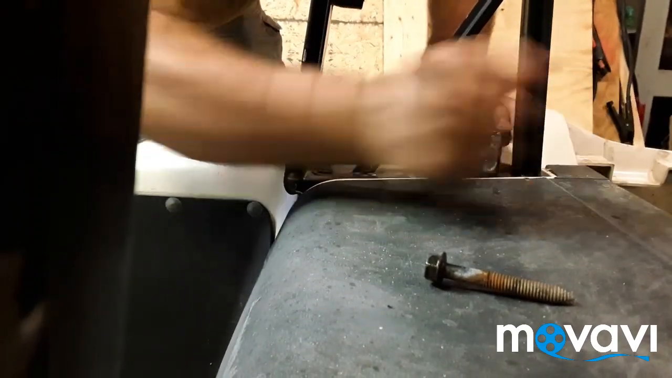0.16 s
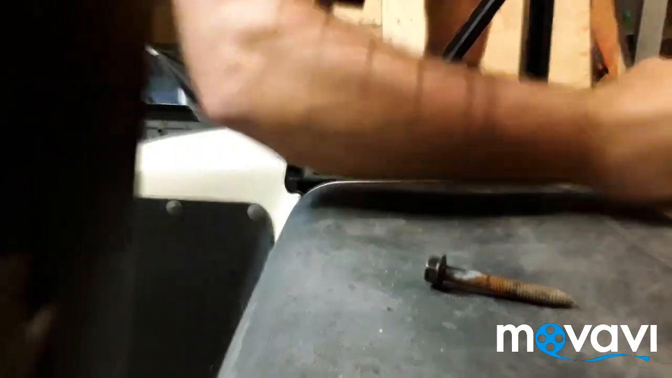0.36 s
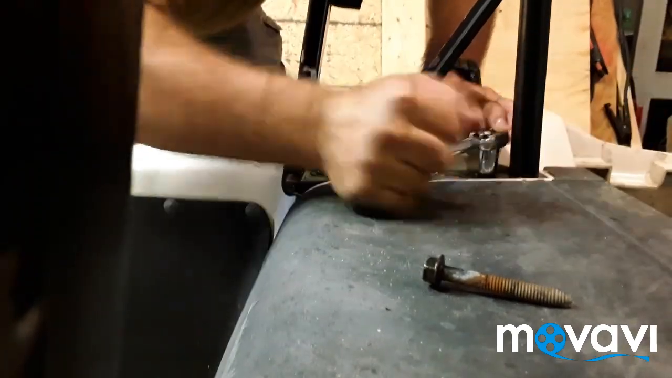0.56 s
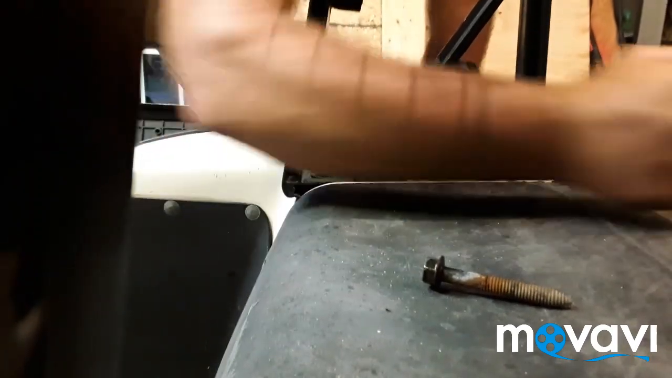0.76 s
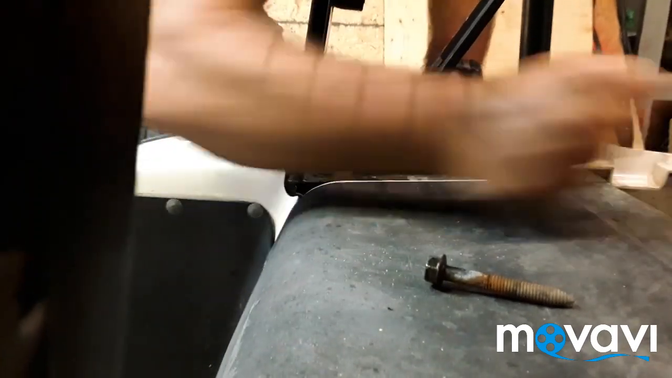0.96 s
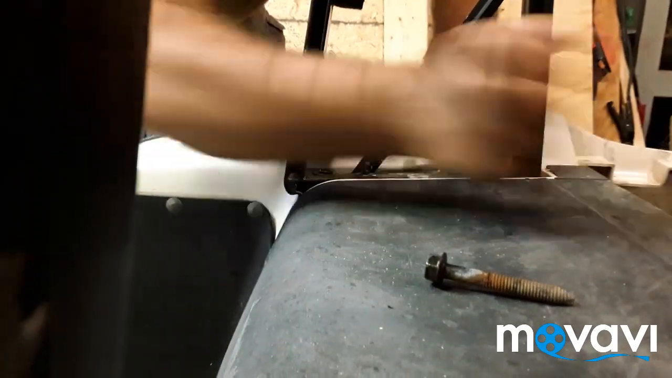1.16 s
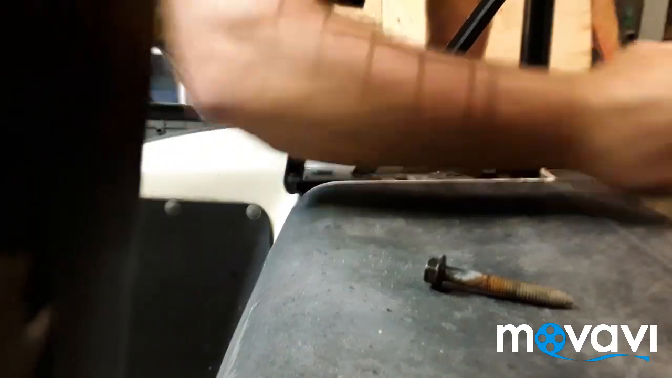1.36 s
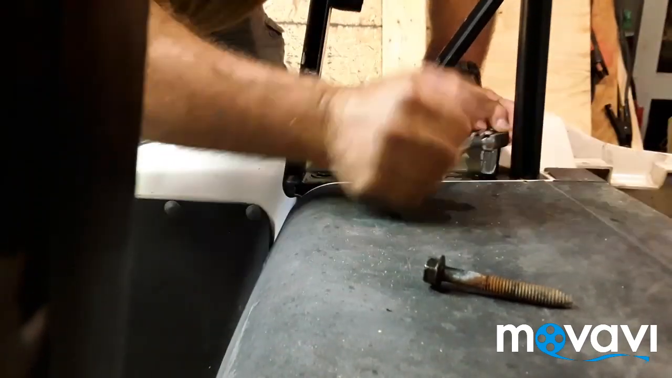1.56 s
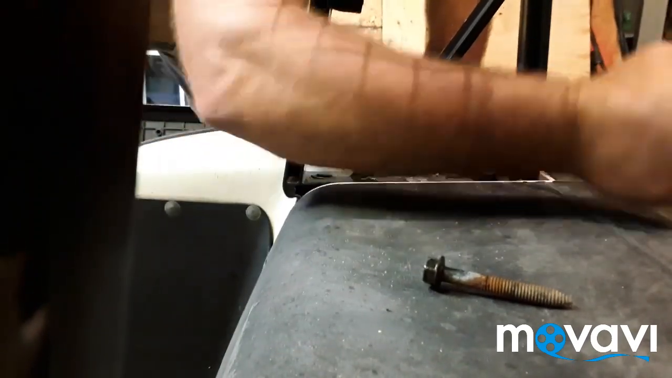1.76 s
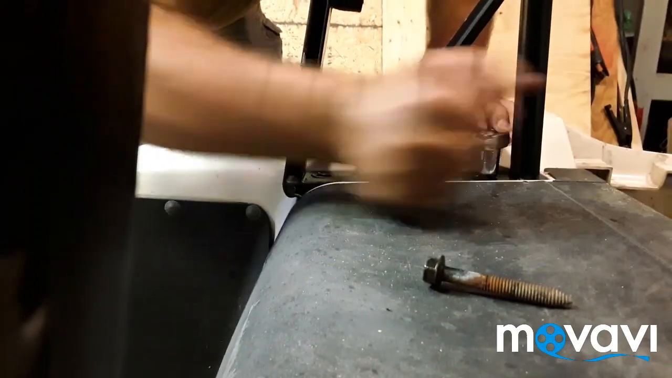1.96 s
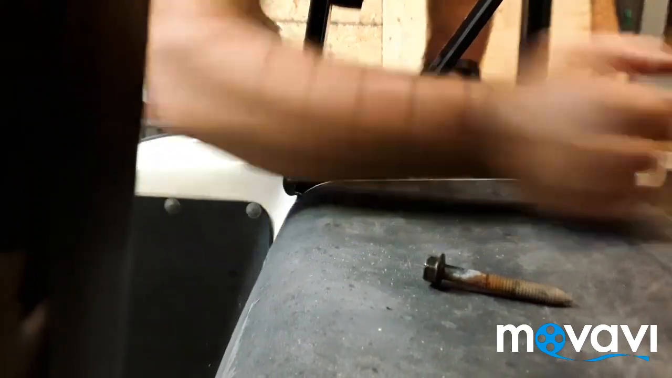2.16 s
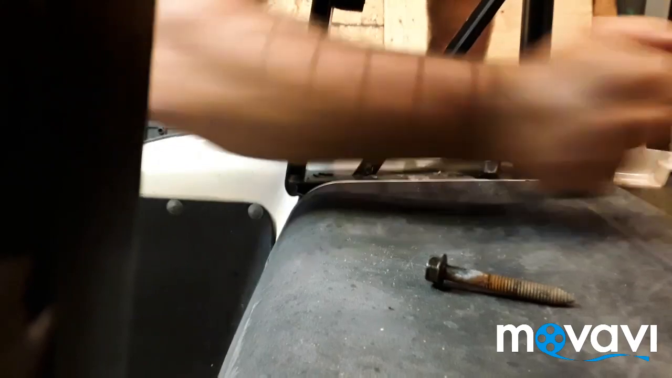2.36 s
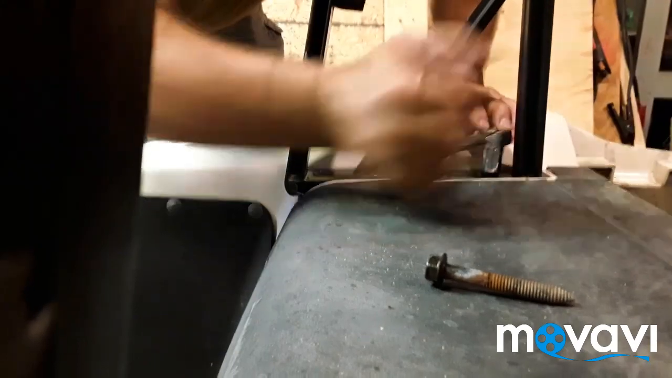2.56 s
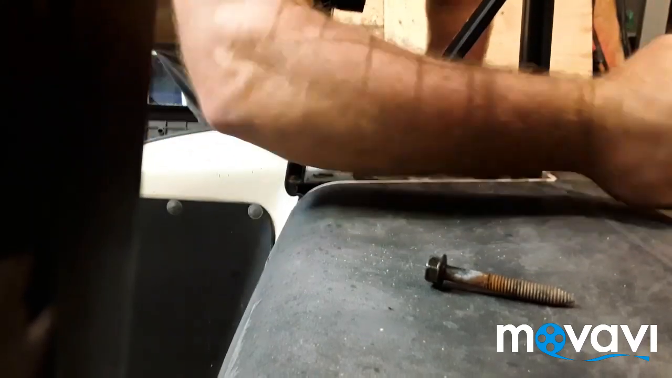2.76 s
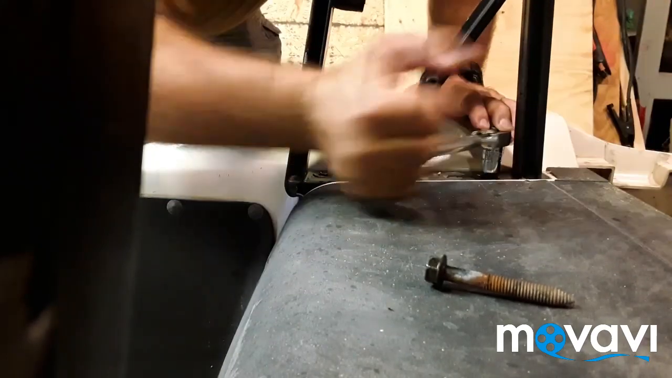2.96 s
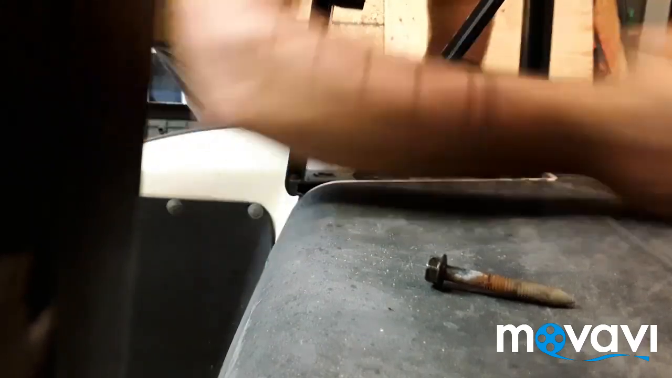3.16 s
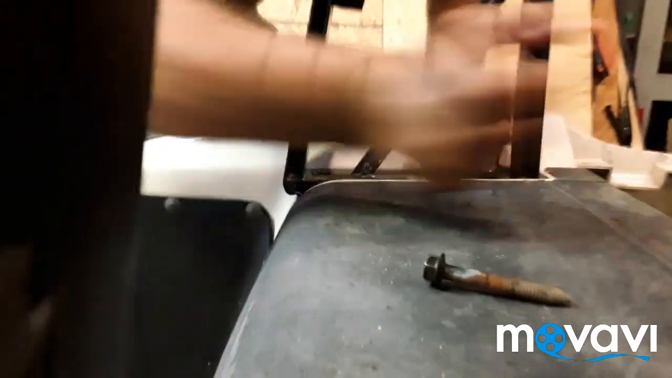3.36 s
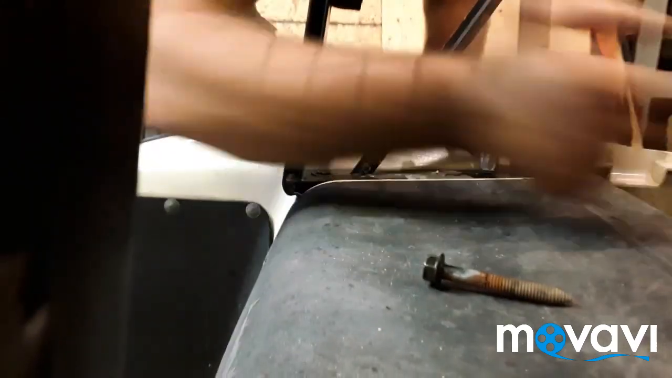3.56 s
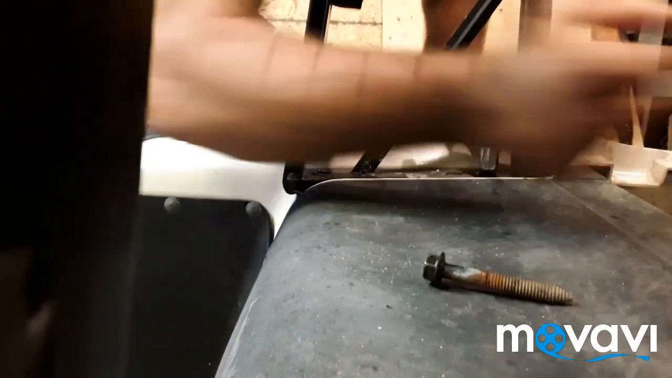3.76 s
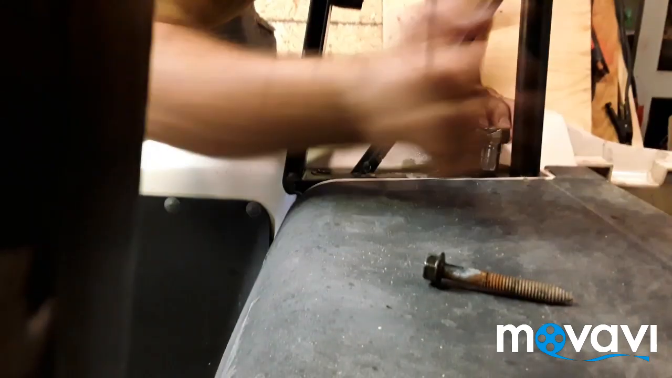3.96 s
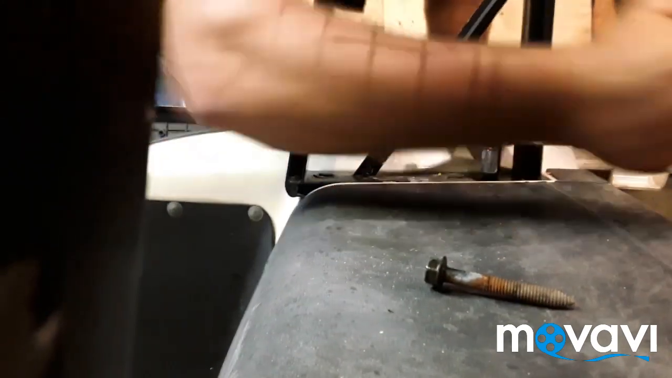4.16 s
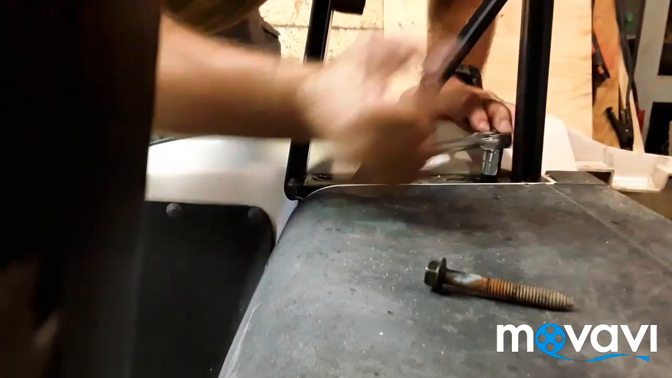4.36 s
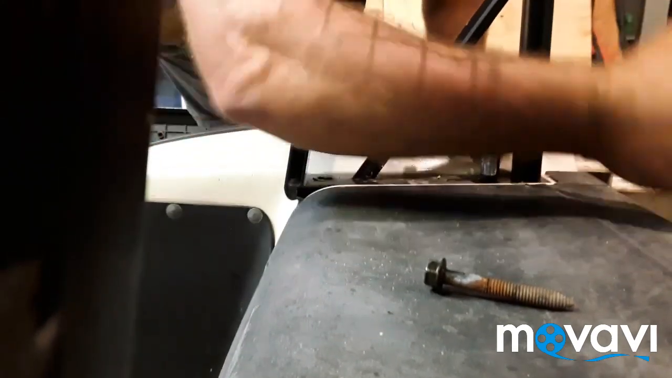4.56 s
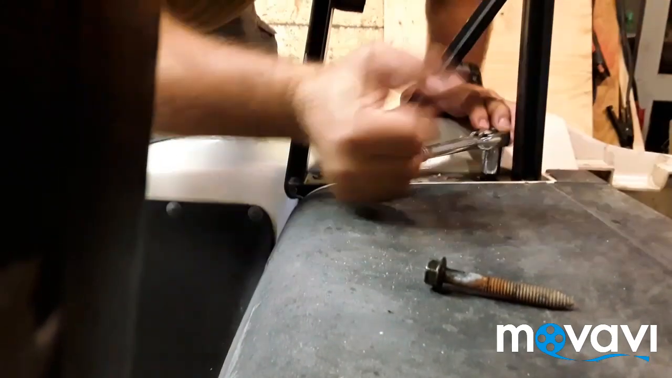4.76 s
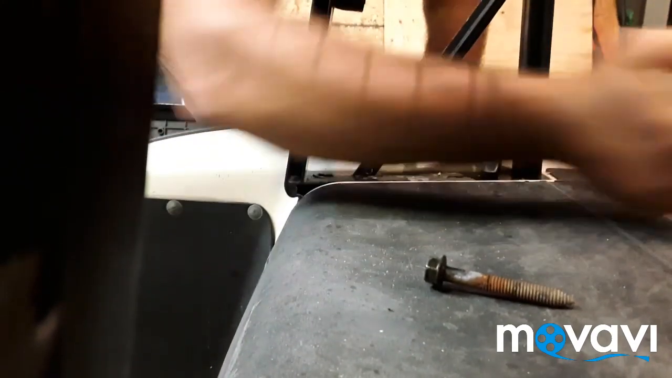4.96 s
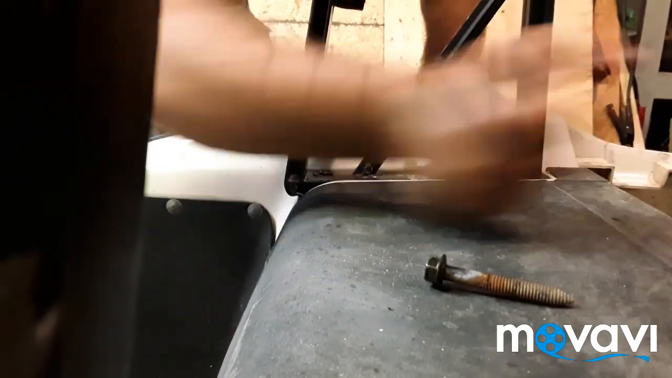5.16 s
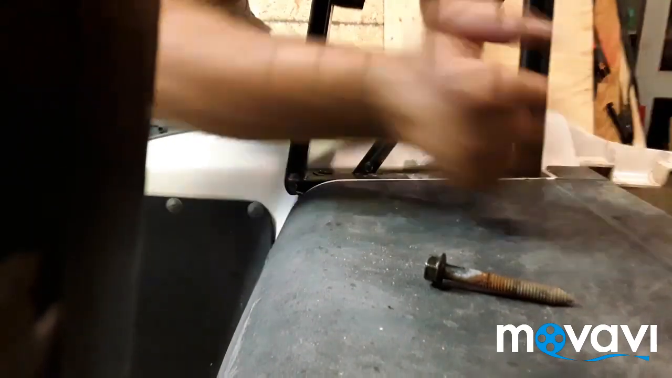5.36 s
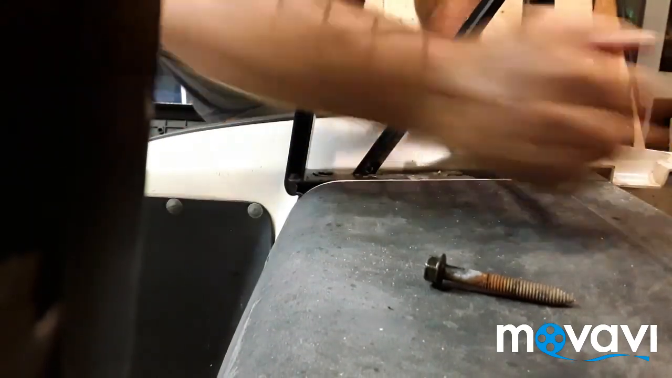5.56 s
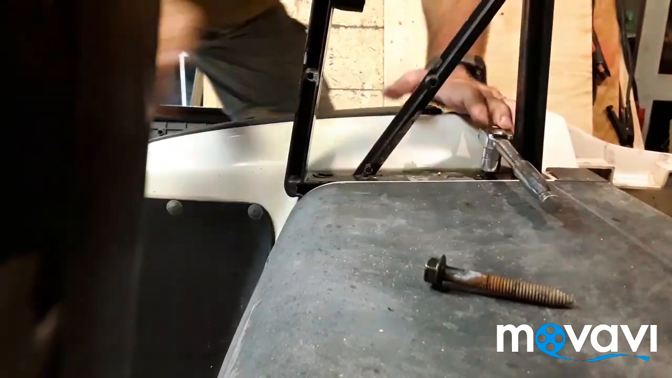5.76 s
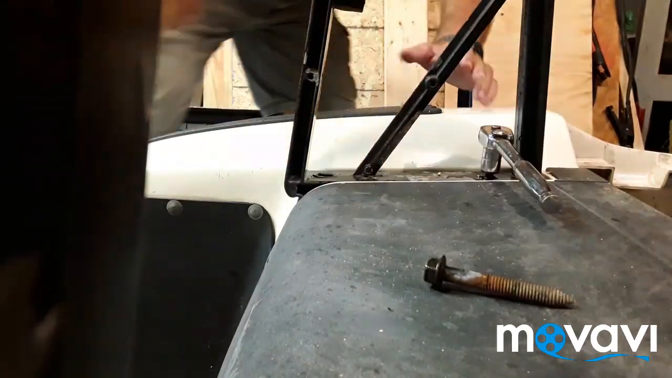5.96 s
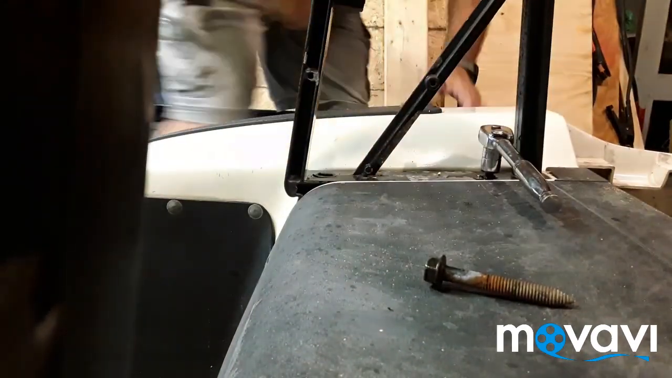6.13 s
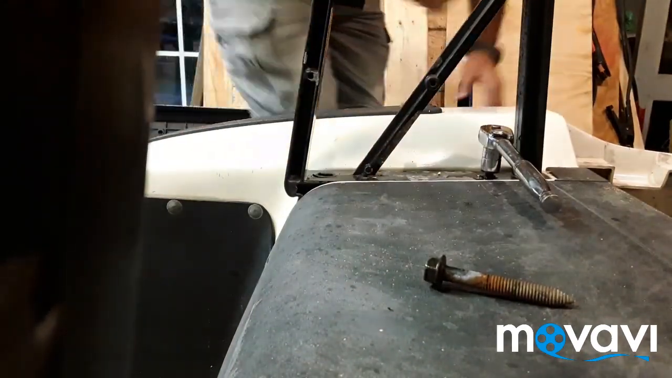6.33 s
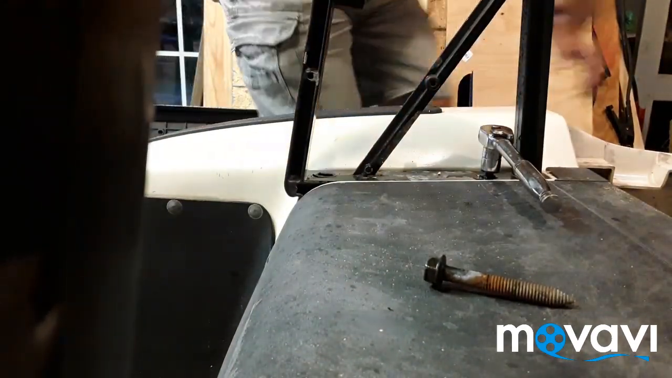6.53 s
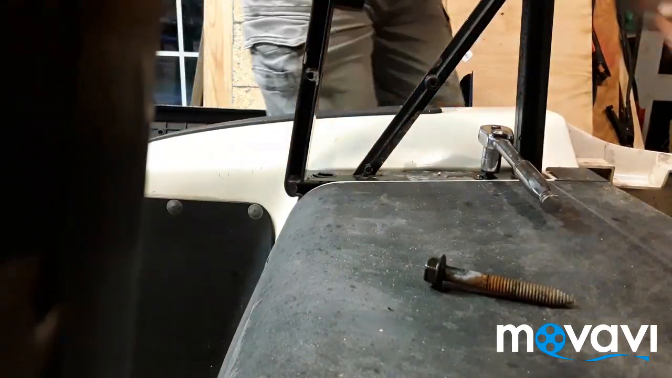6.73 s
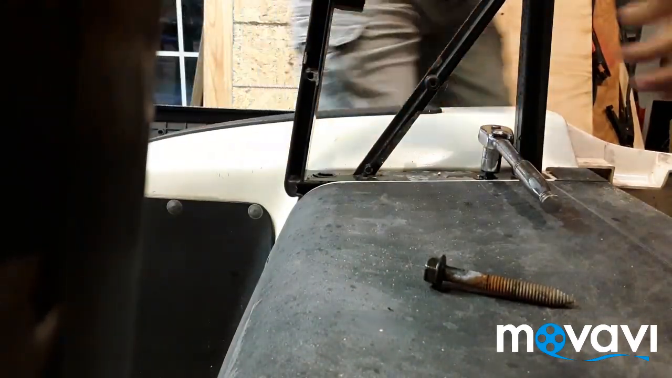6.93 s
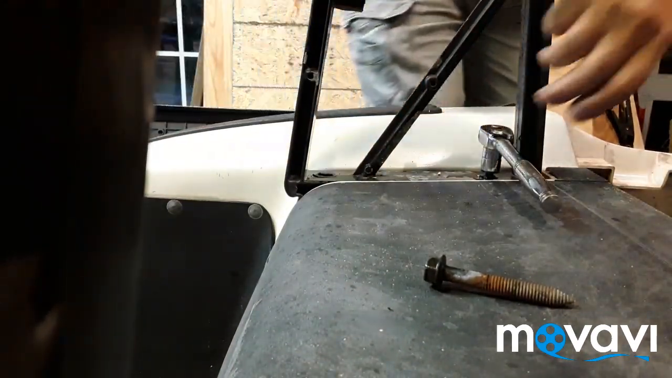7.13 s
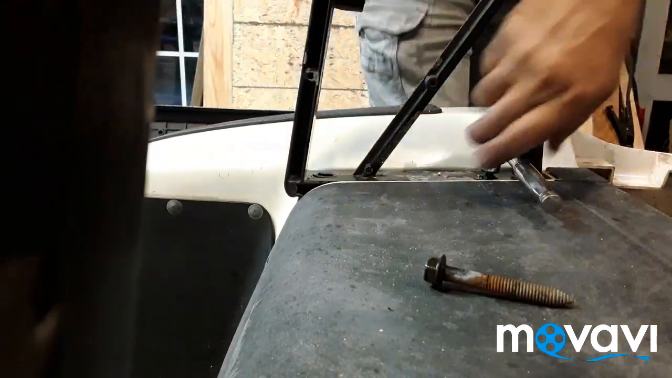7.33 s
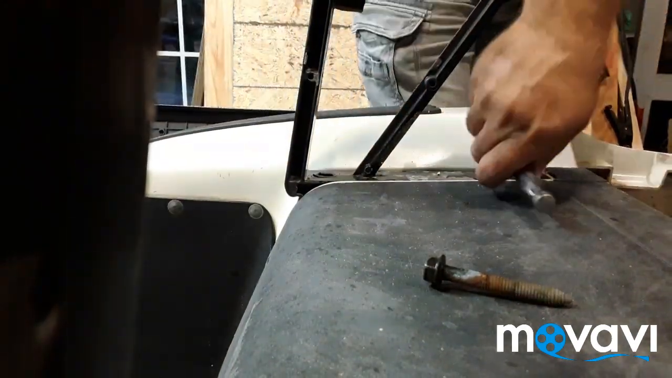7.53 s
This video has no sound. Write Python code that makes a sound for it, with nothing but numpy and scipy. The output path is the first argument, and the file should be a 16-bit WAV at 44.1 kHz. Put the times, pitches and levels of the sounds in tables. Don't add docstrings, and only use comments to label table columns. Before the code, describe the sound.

Close up in a small wooden garage, a ratchet wrench is swung back and forth, its crisp metallic clicks coming in short runs about twice a second. Between runs the socket knocks, a dry bolt groans or squeaks, and panels thud softly. A cricket chirps faintly in a far corner. After five and a half seconds the work stops, leaving cloth rustle, faint taps and a hand rubbing steel. The small microphone sounds bright and thin.

```python
import sys
import numpy as np
from scipy import signal
from scipy.fft import rfft, irfft, next_fast_len
from scipy.io import wavfile

SR = 44100
rng = np.random.default_rng(int(sys.argv[2]) if len(sys.argv) > 2 else 0)


def gain_from_db(level_db):
    decades = np.asarray(level_db, float) / 20
    return 10 ** decades


def master_out(mix):
    frames = np.transpose(np.atleast_2d(mix))
    ceiling = np.clip(frames, -1, 1)
    pcm = np.round(ceiling * 32767).astype(np.int16)
    wavfile.write(sys.argv[1], SR, pcm)


N = 334719

# pitch_hz, level_db, t60_s
FRAME_MODES = [(305, -8, .1), (635, -7, .08), (850, -10, .07), (1082, -4, .13), (1365, -4, .1),
               (1700, -10, .07), (1936, -6, .18), (2051, -4, .06), (2355, -10, .08), (2700, -12, .08),
               (3060, -16, .05)]
# freq_hz, level_db
METAL_BURST = [(2000, -5.5), (4000, -14.5), (6000, -8.5), (7200, -6.5), (8400, -2.5), (9600, -10.5),
               (11500, -28), (14000, -24.5), (16000, -29)]
# freq_hz, level_db
SQUEAL_COLOUR = [(300, -43), (600, -8.5), (900, -13.5), (1700, -12), (2400, -11), (3400, -20.5),
                 (4250, -10.5), (5000, -16.5), (5900, -8.5), (7000, -9), (8400, 4.5), (9600, -11),
                 (12000, -18), (15000, -25.5)]
# start_s, peak_db, pitch_hz
BUMPS = [(0.378, -18.5, 377), (0.443, -29, 150), (0.535, -20.5, 293), (1.018, -25.5, 328),
         (1.366, -26, 145), (1.422, -16.5, 256), (1.516, -26, 148), (1.629, -18, 339), (1.668, -23.5, 170),
         (1.767, -29, 240), (2.33, -17, 231), (2.839, -19.5, 353), (3.283, -16, 200), (3.33, -12.5, 256.6),
         (3.473, -25, 143), (3.615, -27.5, 207), (3.732, -17.5, 285), (3.18, -35.5, 130), (4.244, -30, 132),
         (4.325, -28.5, 140), (4.506, -20.5, 143), (4.627, -20.5, 428), (4.765, -30, 143),
         (5.087, -68, 283), (5.322, -22.5, 210), (5.367, -21, 230), (5.7, -40.5, 120), (5.929, -33, 285),
         (6.44, -39, 200), (7.414, -48, 190)]


def rms_one(x):
    return x / np.sqrt(np.mean(x ** 2) + 1e-20)


def band_pass(x, low_hz, high_hz):
    return signal.sosfilt(signal.butter(2, [low_hz, high_hz], "band", fs=SR, output="sos"), x)


def at_hz(points, hz):
    point_hz, value = np.array(points)[:, :2].T
    return np.interp(np.log(hz + 1), np.log(point_hz), value)


def colour(x, spectrum, smear_s=0):
    size = next_fast_len(len(x))
    hz = np.arange(size // 2 + 1) * SR / size
    delay = np.exp(-2j * np.pi * smear_s * hz ** 2 / SR)
    return irfft(rfft(x, size) * gain_from_db(at_hz(spectrum, hz)) * delay, size)[:len(x)]


def drift(rate_hz):
    knots = rng.standard_normal(N // 100 + 2)
    return np.interp(np.arange(N) * rate_hz / SR, np.arange(len(knots)), knots) * 1.2


def strike(times, levels_db, modes, spread_db, chatter_s, detune, damping, count=4):
    hz, db, t60 = np.transpose(modes)[:, :, None]
    t = np.arange(round(.15 * SR)) / SR
    gaps = rng.random((len(times), count)) * chatter_s
    gaps[:, 0] = 0
    luck = rng.standard_normal((len(times), len(modes), count + 2))
    out = np.zeros(N + 2 * len(t))
    for s, level_db, gap, draw in zip(times, levels_db, gaps, luck):
        decay = np.exp(-np.log(1000) * damping * t / t60)
        rings = np.sin(2 * np.pi * hz * (1 + detune * draw[:, :1]) * t) * decay
        contact_luck = draw[:, 2:]
        gains = gain_from_db(level_db + db + spread_db * (draw[:, 1:2] + .5 * contact_luck)) * np.sign(contact_luck)
        gains[:, 1:] *= .6
        starts = np.round((s + gap) * SR).astype(int)
        for i, contact in zip(starts, gains.T @ rings):
            out[i:i + len(t)] += contact
    return out[:N]


def crack(times, levels_db, t60, low_hz, high_hz):
    clicks = np.zeros(N)
    clicks[np.round(np.array(times) * SR).astype(int)] = gain_from_db(np.array(levels_db))
    fading = signal.lfilter([1], [1, -gain_from_db(-60 / (t60 * SR))], clicks + 1e-18)
    fading = signal.lfilter([.04], [1, -.96], fading)
    return band_pass(fading * rng.standard_normal(N), low_hz, high_hz)


def earlier_tail():
    return colour(crack([0], [-21.], 0.36, 300, 10400), SQUEAL_COLOUR)


def air():
    # freq_hz, level_db
    air_colour = [(15, -30.5), (25, 4), (49, 2.5), (120, -3.5), (451, -3), (641, -10.5), (2280, -19),
                  (3430, -27), (6210, -24.5), (8360, -8.5), (16000, -72)]
    return gain_from_db(-65) * rms_one(colour(rng.standard_normal(N), air_colour))


def effort():
    # time_s, level_db
    hand_weight = [(0.0, -56.5), (1.33, -50), (1.56, -51.5), (2.01, -57), (2.43, -47), (2.64, -51.5),
                   (3.23, -57.5), (3.38, -49.5), (4.1, -57), (4.29, -47.5), (4.99, -53.5), (5.3, -50),
                   (6.09, -73.5), (7.59, -68.5)]
    shake_db, db_per_octave = -15, -7
    rise_s, t60_s = 0.0085, 0.23
    s, db, hz = np.transpose(BUMPS)
    pushes = np.zeros(N)
    pushes[np.round(s * SR).astype(int)] = gain_from_db(db + shake_db + db_per_octave * np.log2(hz / 200))
    fading = signal.lfilter([1], [1, -gain_from_db(-60 / (t60_s * SR))], pushes + 1e-18)
    rise = np.exp(-1 / (rise_s * SR))
    shaking = signal.lfilter([1 - rise], [1, -rise], fading)
    return shaking + gain_from_db(np.interp(np.arange(N) / SR, *np.transpose(hand_weight)))


def movement():
    # freq_hz, density_db
    rumble_colour = [(15, -38.5), (25, -20.5), (189, -4), (248, -4.5), (327, -4), (437, -11), (510, -15.5),
                     (694, -23.5), (1500, -24), (1950, -54.5), (3300, -120)]
    # freq_hz, density_db
    cloth_colour = [(300, -14), (1000, -12.5), (3000, -16.5), (5500, -15.5), (7000, -12.5), (8400, 2),
                    (9800, -13.5), (12000, -28.5), (15000, -39)]
    # time_s, level_db
    cloth_moves = [
        (5.55, -58),
        (5.78, -52),
        (5.85, -63),
        (6.08, -62),
        (6.36, -60),
        (6.43, -54),
        (6.55, -58),
        (6.92, -54),
        (7.05, -70),
    ]
    rumble = rms_one(colour(rng.standard_normal(N), rumble_colour)) * gain_from_db(-2 + 5.35 * drift(40))
    deep = band_pass(rng.standard_normal(N), 80., 160.)
    sway = rms_one(deep) * gain_from_db(-3.5 + 4.1 * drift(11))
    rustle_db = np.interp(np.arange(N) / SR, *np.transpose(cloth_moves), left=-64) + 1.8 * drift(25)
    rustle = rms_one(colour(rng.standard_normal(N), cloth_colour)) * gain_from_db(rustle_db)
    return effort() * (rumble + sway) + rustle


def teeth():
    # first_tooth_s, last_but_one_s, last_tooth_s, peak_db, tube_share_db
    back_swings = [(0.0684, 0.1262, .1647, -14, -31), (.5383, 0.631, .6799, -14.5, -27.5),
                   (1.052, 1.1134, 1.1524, -13, -38), (1.5137, 1.577, 1.6102, -10.5, -33.5),
                   (2.0061, 2.067, 2.11, -10.5, -37.5), (2.4639, 2.547, 2.582, -10, -29.5),
                   (2.9752, 3.028, 3.0586, -11, -27), (3.402, 3.486, 3.5209, -8.5, -34.5),
                   (3.8645, 3.916, 3.9527, -10, -24), (4.297, 4.374, 4.3992, -9.5, -31.5),
                   (4.7546, 4.833, 4.8708, -10, -29.5), (5.2243, 5.3054, 5.3488, -9, -23.5)]
    # start_s, peak_db, frame_share_db, tube_share_db
    loose_play = [(.4638, -15, -23, -36.5), (1.1912, -18.5, -6.5, -14.5), (1.4097, -23, -4.5, -34),
                  (1.4442, -40, -34, -18), (1.731, -27, -4.5, -14.5), (1.935, -34, 0.5, -5),
                  (2.4189, -26.5, -11, -16), (2.68, -37, 6.5, 0.5), (2.922, -43.5, 13.5, -7),
                  (2.9402, -32.5, -12, -10), (3.1969, -23.5, -13, -21.5), (3.362, -26, -6, -7.5),
                  (4.2357, -24, -28, -31), (4.2647, -32, -23, -26), (4.5537, -36, -38, -23),
                  (5.1926, -34, -2, -23)]
    tooth_s = .028
    rise_db, tooth_spread_db = 1.5, 1.5
    frame_share_db, socket_share_db, share_spread_db = -15.5, -24, 3.5
    rows = []
    for first, near_last, last, db, tube_db in back_swings:
        steps = round((near_last - first) / tooth_s) + 1
        times = np.append(np.linspace(first, near_last, steps), last)
        luck = rng.standard_normal((4, 6))[:, :len(times)]
        usual_shares = np.array([[frame_share_db], [tube_db], [socket_share_db]])
        shares = usual_shares + share_spread_db * luck[1:]
        peak = db + rise_db * np.linspace(-.5, .5, len(times)) + tooth_spread_db * luck[0]
        rows += list(zip(times, peak, *shares))
    return rows + [(*row, socket_share_db) for row in loose_play]


def pawl():
    # pitch_hz, level_db, t60_s
    head_modes = [(4713, -17, 0.024), (5170, -28.5, 0.049), (6100, -43, 0.0083), (6650, -17.5, 0.0088),
                  (7604, -4, 0.036), (8050, 3, 0.015), (8570, 4.5, 0.0082), (8700, -4.5, 0.0083),
                  (11000, -17, 0.018), (11360, -5.5, 0.0055), (12420, -18.5, .02)]
    tube_modes = [(647, 0.0097, 0.056)]
    socket_modes = [(4181, 0, 0.024)]
    # start_s, peak_db
    socket_rocks = [
        (0.6294, -25),
        (1.1139, -26.5),
        (1.579, -26),
        (2.0365, -18),
        (2.068, -30),
        (2.548, -26),
        (3.485, -34),
        (4.779, -31),
    ]
    s, db, frame_db, tube_db, socket_db = np.transpose(teeth())
    rock_s, rock_db = np.transpose(socket_rocks)
    ring_s = np.append(s, rock_s)
    ring_db = np.append(db + socket_db, rock_db) - 1.0
    head = strike(s, db - 10.5, head_modes, spread_db=-0.5, chatter_s=.005, detune=0.013, damping=0.92)
    frame = strike(s, db + frame_db - 20, FRAME_MODES, spread_db=3.0, chatter_s=.004, detune=.02, damping=3.0)
    tube = strike(s, db + tube_db + 1.5, tube_modes, spread_db=3.5, chatter_s=0.00408, detune=0.013,
                  damping=0.72, count=2)
    socket = strike(ring_s, ring_db, socket_modes, spread_db=2.5, chatter_s=0.0057, detune=0.0064,
                    damping=0.82, count=2)
    bright = colour(crack(s, db - 0.5, 0.017, 2100, 22000), METAL_BURST)
    frame_burst = crack(s, db + frame_db + 1, 0.083, 1000, 2800)
    return head + frame + tube + socket + bright + frame_burst


def stick_slip(rate, db, uneven, lowest):
    noise = rng.standard_normal((2, round(.15 * SR)))
    wander = signal.lfilter([.05], [1, -.95], noise)[:, :len(rate)] * 6
    swing = np.cos(2 * np.pi * np.cumsum(rate * (1 + .7 * uneven * wander[0]) / SR))
    sharpness = 4.9 * (3000 / rate) ** 2
    slips = np.exp(sharpness * (swing - 1))
    lowest_partial = 2 * np.mean(slips * swing) * swing
    slips = slips - slips.mean() - (1 - lowest) * lowest_partial
    return gain_from_db(db + 40 * uneven * wander[1]) * rms_one(slips)


def squeals():
    # time_s, slip_rate_hz, level_db
    long_groans = [
        [(.285, 1084, -21.5), (.297, 1125, -23), (.333, 1128, -22.5), (.37, 1191, -25), (.378, 1375, -23),
         (.43, 1364, -43.5)],
        [(.837, 768, -22.5), (.847, 829, -19), (.888, 851.4, -19), (.905, 846, -31.5), (.93, 833, -25.5),
         (.96, 830, -59)],
        [(1.269, 1212, -26.5), (1.28, 1160, -24), (1.29, 1130, -33), (1.33, 1134, -41)],
    ]
    groan_uneven = (.115, .085, 0.056)
    # start_s, length_s, slip_rate_hz, level_db, upward_glide_share
    short_squeaks = [
        (2.208, 0.04, 2907, -26.5, 0.011),
        (2.211, .039, 3060, -23, 0.0453),
        (4.088, .053, 2934, -25, 0.038),
        (4.094, 0.057, 3288, -17.5, 0.099),
    ]
    lowest_loss = 0.37
    attack_s, glide_s, fade_db = 0.0013, .01, 17
    out = np.zeros(N)
    for rows, uneven in zip(long_groans, groan_uneven):
        s, hz, db = np.transpose(rows)
        i = np.arange(round(s[0] * SR), round(s[-1] * SR))
        lowest = np.clip(1 - lowest_loss * 2 * np.linspace(0, 1, len(i)), .15, 1)
        out[i] += stick_slip(np.interp(i / SR, s, hz), np.interp(i / SR, s, db), uneven, lowest)
    for s, length, hz, db, glide in short_squeaks:
        t = np.arange(round(length * SR)) / SR
        rate = hz * (1 - glide * np.exp(-t / glide_s))
        slips = stick_slip(rate, db - fade_db * t / length, uneven=.04, lowest=0.72)
        out[round(s * SR):][:len(t)] += slips * np.minimum(t / attack_s, 1)
    return gain_from_db(10.0) * colour(out, SQUEAL_COLOUR, smear_s=0.0033)


def thuds():
    out = np.zeros(N)
    t = np.arange(round(.12 * SR)) / SR
    for s, db, hz in BUMPS:
        i = round(s * SR)
        fade = gain_from_db(db + 4.5 - 60 * t / (7.3 / hz))
        bump = fade * np.sin(2 * np.pi * hz * t) * (1 - np.exp(-t / 0.0029))
        out[i:i + len(t)] += bump[:N - i]
    s, db, _ = np.transpose(BUMPS)
    return out + crack(s, db + 6.0, 0.037, 300, 900)


def knocks():
    # start_s, peak_db, treble_share_db
    socket_knocks = [(0.539, -53.5, 2), (1.355, -21.5, -2), (1.929, -38, -8), (2.193, -38, 10.5),
                     (2.322, -24, -6.5), (2.841, -36, -5), (3.173, -35, 2), (3.27, -17, -0.5),
                     (3.734, -25, -3), (4.074, -36.5, 9.5), (4.162, -17.5, 1), (4.501, -35.5, 5.5),
                     (4.628, -24, -4.5), (5.087, -21, -1.5)]
    s, db, treble_db = np.transpose(socket_knocks)
    frame = strike(s, db - 11, FRAME_MODES, spread_db=2.0, chatter_s=.012, detune=.004, damping=1)
    panels = crack(s, db + 11.5, 0.072, 159, 1190) + crack(s, db - 2.0, 0.13, 1270, 2600)
    bright = colour(crack(s, db + treble_db + 3.5, 0.11, 2400, 13000), METAL_BURST)
    return frame + panels + bright


def cricket():
    # start_s, level_db
    chirp_times = [
        (1.764, -36.5),
        (2.271, -42),
        (2.754, -36.5),
        (3.447, -43.5),
        (3.847, -39),
        (4.3, -41.5),
        (5.448, -38),
        (6.025, -41),
        (6.773, -45.5),
    ]
    # delay_s, length_s, first_hz, last_hz, level_db
    wing_strokes = [
        (0, .022, 4480, 4400, -8),
        (.034, .028, 4640, 4330, -2),
        (.081, .029, 4640, 4310, 0),
        (.128, .029, 4640, 4290, 0),
    ]
    out = np.zeros(N)
    for start, level_db in chirp_times:
        for delay, length, first_hz, last_hz, db in wing_strokes:
            u = np.arange(round(length * SR)) / (length * SR)
            phase = 2 * np.pi * np.cumsum(first_hz + (last_hz - first_hz) * u ** 2) / SR
            second = gain_from_db(-14) * (1 - u) * np.sin(2 * phase)
            tone = np.sin(phase) + second + gain_from_db(-27) * np.sin(3 * phase)
            i = round((start + delay) * SR)
            out[i:i + len(u)] += gain_from_db(level_db + db) * np.sqrt(np.sin(np.pi * u)) * tone
    return out


def taps():
    # start_s, peak_db, treble_share_db
    contacts = [(5.615, -44, -7), (5.673, -33.5, -21), (5.916, -50, 20), (5.93, -63, -6), (6.137, -85, -14),
                (6.229, -69, 5), (6.369, -45, -15), (6.437, -42, -4), (6.975, -45, -14.5),
                (7.179, -49.5, -5), (7.296, -50, -14), (7.414, -43, -25), (7.563, -47, 22)]
    s, db, treble_db = np.transpose(contacts)
    return crack(s, db + 1.5, 0.16, 140, 1340) + crack(s, db + treble_db - 13.5, 0.0034, 1600, 12000)


def rub():
    # pitch_hz, width_hz, level_db
    resonances = [(2270, 260, -0.5), (3040, 75, -10), (4310, 230, -3)]
    start_s, peak_s, end_s, edge_s = 6.13, 6.65, 7.0, 0.028
    level_db, swell_db = -63, 11.5
    noise, out, t = rng.standard_normal(N), 0, np.arange(N) / SR
    for hz, width_hz, db in resonances:
        out = out + gain_from_db(db) * rms_one(band_pass(noise, hz - width_hz / 2, hz + width_hz / 2))
    swell = np.interp(t, [start_s, peak_s, end_s], [-swell_db, 0, -swell_db])
    edges = np.clip(np.minimum(t - start_s, end_s - t) / edge_s, 0, 1)
    return out * gain_from_db(level_db + swell) * edges


def garage(x, first_s):
    # freq_hz, t60_s
    room_decay = [(100, .3), (500, 0.44), (1500, 0.4), (4000, 0.41), (9000, 0.36), (15000, 0.47)]
    t = np.arange(round(.6 * SR)) / SR
    edges, tail = 70 * 2 ** np.arange(0, 8.1, .5), 0
    for low, high in zip(edges, edges[1:]):
        band = band_pass(rng.standard_normal(len(t)), low, high)
        tail = tail + band * gain_from_db(-60 * t / at_hz(room_decay, np.sqrt(low * high)))
    tail = tail * np.clip(t / first_s - 1, 0, 1)
    return signal.fftconvolve(x, tail / np.sqrt(np.sum(tail ** 2)))[:N]


def scene():
    work, bumps, far = pawl() + knocks() + squeals() + taps(), thuds(), cricket()
    muffled = .3 * bumps
    room = garage(gain_from_db(-5.0) * work + muffled, first_s=0.0032)
    dull = signal.sosfilt(signal.butter(4, 6000, fs=SR, output="sos"), far)
    corner = .62 * far + garage(.77 * dull, first_s=.006)
    return (work + bumps + room + earlier_tail() + corner + movement() + rub() + air())[None]


def roll_off(x):
    return signal.sosfilt(signal.butter(12, 16510, fs=SR, output="sos"), x)


def record(dry):
    thin = signal.sosfilt(signal.butter(2, 60., "high", fs=SR, output="sos"), dry)
    rounded = .42 * np.tanh(thin / .42)
    cut = signal.sosfilt(signal.cheby2(12, 60, 16700, fs=SR, output="sos"), rounded)
    return roll_off(cut)


dry = scene()
out = record(dry)
master_out(out)
```